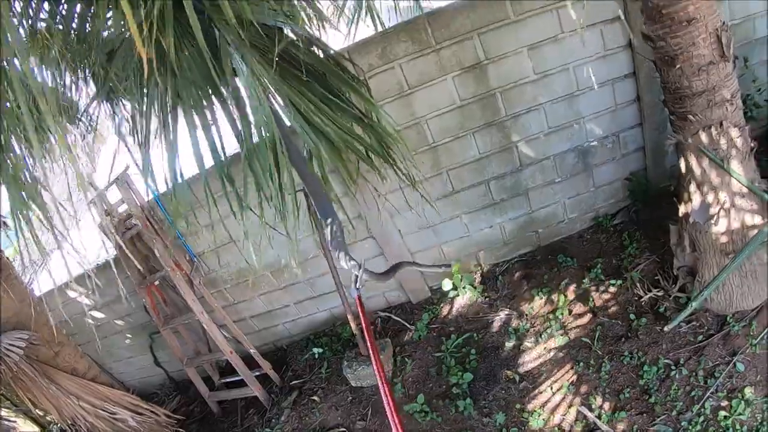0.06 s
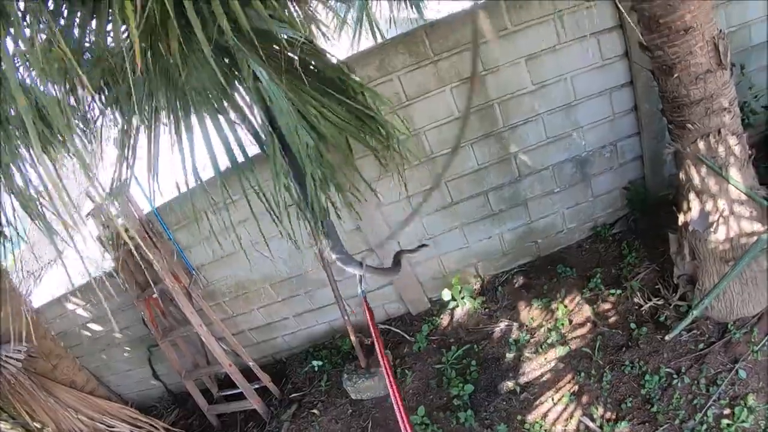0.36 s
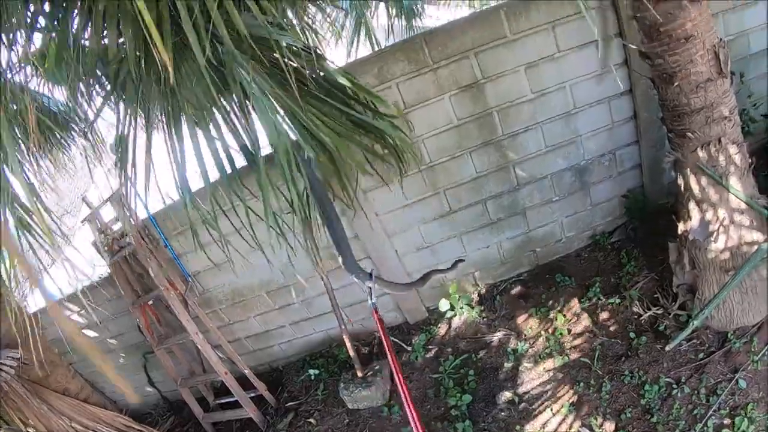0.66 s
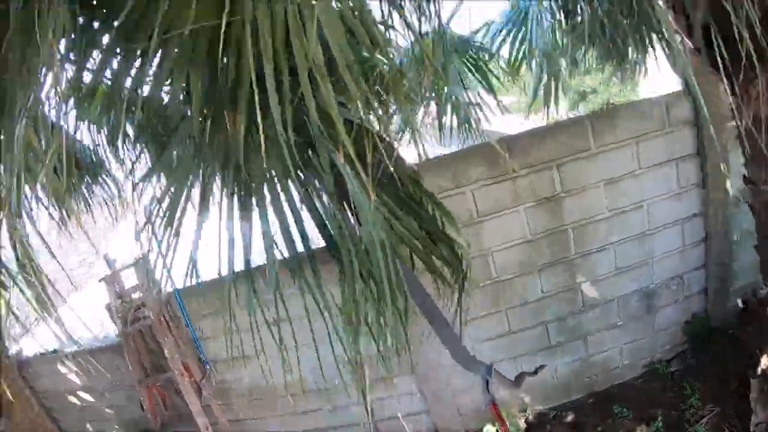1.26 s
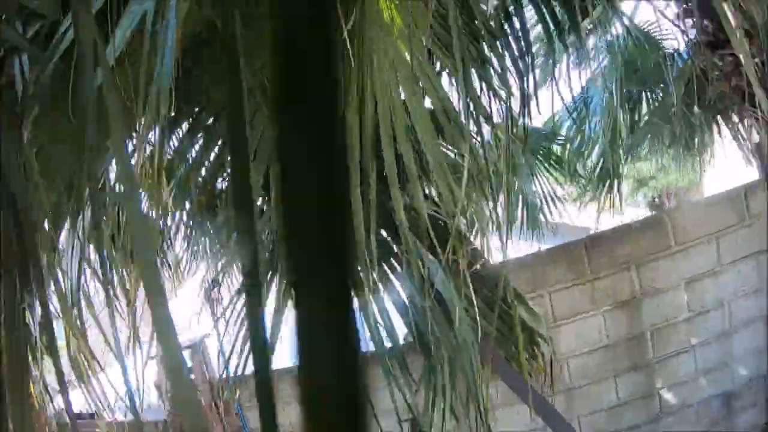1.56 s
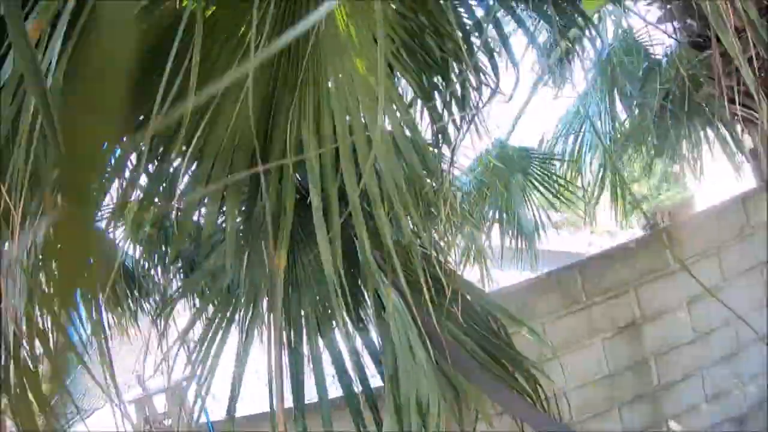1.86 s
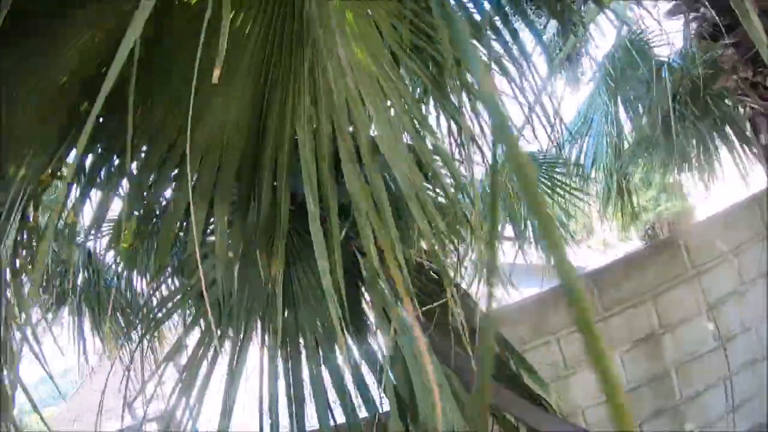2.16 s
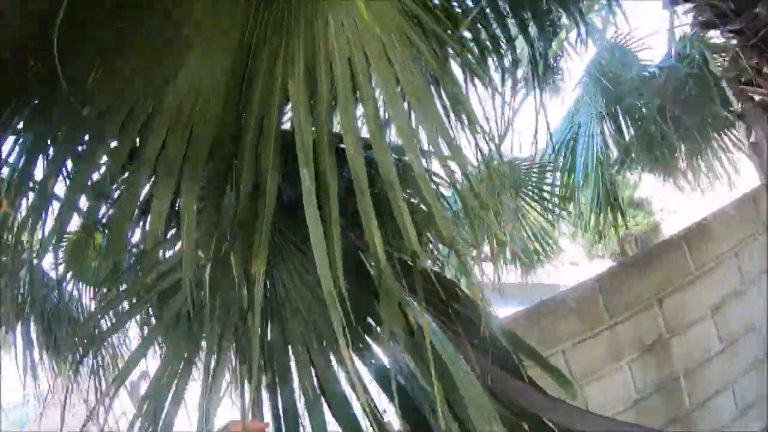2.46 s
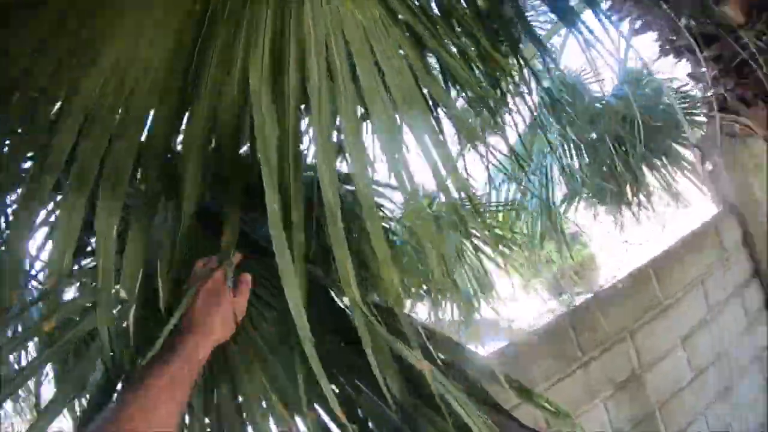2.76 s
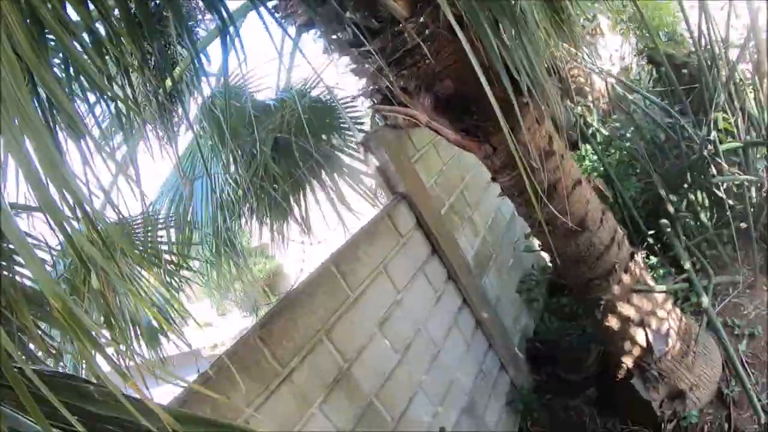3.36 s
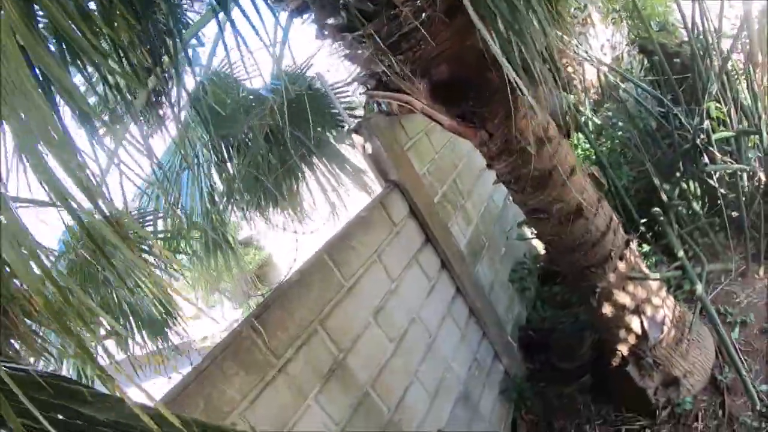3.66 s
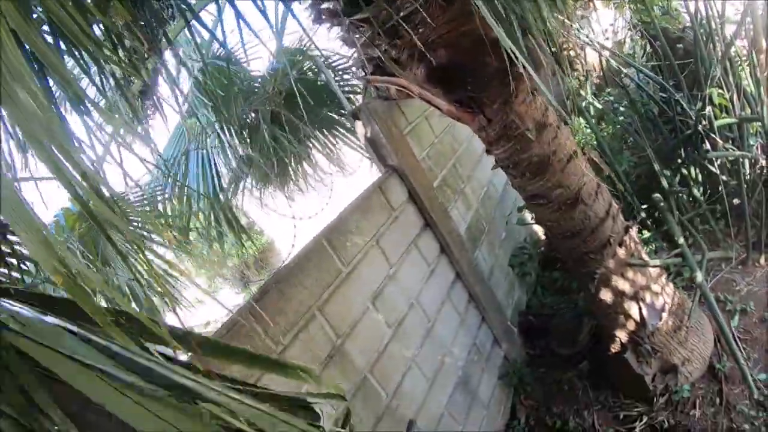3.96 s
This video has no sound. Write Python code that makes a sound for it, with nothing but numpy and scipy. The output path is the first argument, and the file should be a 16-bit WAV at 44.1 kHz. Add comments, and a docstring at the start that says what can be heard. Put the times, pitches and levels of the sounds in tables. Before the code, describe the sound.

Stiff palm fronds snap and scrape against the microphone over low wind rumble.

```python
"""Stiff fan palm fronds snap and scrape against a camera as someone carries it through them in a yard.
Leaf tips strike the shell and blades slide along it in tiny slips; each contact rings leaf and shell.
Something soft and heavy bumps the camera once. Wind and handling rumble in its two microphone ports,
over a steady distant hiss. Gain control dips after the loudest moments."""
import sys
import numpy as np
from scipy import signal
from scipy.fft import rfft, irfft
from scipy.io import wavfile
from scipy.ndimage import uniform_filter1d

SR = 44100
rng = np.random.default_rng(int(sys.argv[2]) if len(sys.argv) > 2 else 0)


def wrap_up_sound(samples):
    """Save the sound to the file named by the first command line argument, as 16-bit audio."""
    columns = np.atleast_2d(samples).T
    # keep every value between -1 and 1, then stretch to whole-number steps
    tamed = np.clip(columns, -1, 1)
    steps = np.round(tamed * 32767).astype(np.int16)
    wavfile.write(sys.argv[1], SR, steps)


N = 176400

# Contact balance, left minus right: bass_pan_db, middle_pan_db, treble_pan_db
CONTACT_PAN_DB = [-1.5, -.6, 1.8]


def amp(db):
    """Decibels to gain."""
    return 10 ** (np.asarray(db) / 20)


def spectrum_at(points, hz):
    """Interpolates (freq_hz, value) rows on a log-frequency axis."""
    freq_hz, value = np.transpose(points)
    return np.interp(np.log(hz + 1), np.log(freq_hz + 1), value)


def curve(points):
    """Joins (time_s, value) rows by straight lines."""
    return np.interp(np.arange(N) / SR, *np.transpose(points))


def pan(db):
    """Constant-power stereo gains from left minus right dB."""
    gains = amp(np.array([np.atleast_1d(db), -np.atleast_1d(db)]) / 2)
    return gains / np.sqrt(np.mean(gains ** 2, axis=0))


def add(mix, start_s, sound):
    """Mixes in a stereo sound."""
    part = mix[:, max(round(start_s * SR), 0):][:, :sound.shape[1]]
    part += sound[:, :part.shape[1]]


def hiss():
    """Distant hiss, strongest near 2 kHz and to the right, over the low rumble of the surroundings."""
    colour = [(71, -41), (120, -10.5), (184, -4.5), (217, -8.5), (301, -19), (334, -23), (362, -22),
              (580, -27), (742, -22.5), (1190, -22), (1490, -5.5), (1940, -7), (2290, -5), (2810, -7),
              (3050, -14), (4230, -24.5), (7200, -25), (13600, -54), (16000, -51)]  # mid spectrum: freq_hz, gain_db
    swell = [(0, 2), (.4, 4.5), (.8, 4.5), (1.2, 6.5), (2.2, 4), (3.2, 5), (3.6, 2), (3.9, 7), (4, 6)]  # slow drift: time_s, gain_db
    width = [(110, 11), (200, 3.5), (380, 3.5), (700, 14), (1290, 2), (2380, -6), (4400, 3.5), (8120, 1.5),
             (15000, 1)]  # stereo width: freq_hz, side_minus_mid_db
    balance = [(200, -.5), (1100, -1.5), (1550, -3.5), (2000, -4), (2400, -12.5), (3000, -6), (3800, 0),
               (4500, -7), (5500, 4), (7500, 4), (10000, 0.5)]  # direction: freq_hz, pan_db
    gain_db, low_cut_hz = -56, 70
    hz = np.fft.rfftfreq(N, 1 / SR)
    low_cut = hz ** 2 / (hz ** 2 + low_cut_hz ** 2)
    mid, side = rfft(rng.standard_normal((2, N))) * amp(spectrum_at(colour, hz)) * low_cut
    side *= amp(spectrum_at(width, hz))
    stereo = irfft(np.array([mid + side, mid - side]) * pan(spectrum_at(balance, hz)), N)
    return stereo / np.std(irfft(mid, N)) * amp(gain_db + curve(swell))


def wind():
    """Gusts and handling buffet both ports nearly alike."""
    gusts = [(0.0, -43.5), (0.41, -50), (1.05, -39.5), (1.09, -25), (1.18, -32.5), (1.2, -51), (1.26, -30),
             (1.4, -31.5), (1.7, -39.5), (1.86, -28), (1.93, -41.5), (1.98, -27.5), (2.02, -45),
             (2.09, -33), (2.14, -62), (2.19, -29), (2.35, -46), (2.45, -12), (2.61, -35.5), (2.65, -28),
             (2.84, -37), (2.87, -25), (3.11, -33.5), (3.16, -54), (3.19, -32.5), (3.34, -27),
             (3.39, -39.5), (3.81, -26), (3.85, -39.5), (4.0, -46.5)]  # buffeting envelope: time_s, gain_db
    colour = [(10, -8.5), (22, 1), (40, 3.5), (55, -4), (75, -20.5), (110, -27), (200, -50), (400, -57),
              (900, -87)]  # rumble spectrum: freq_hz, gain_db
    gain_db, pan_db, high_cut_hz, common_share = 1, -1.8, 900, 0.96
    hz = np.fft.rfftfreq(N, 1 / SR)
    shape = amp(spectrum_at(colour, hz)) / (1 + (hz / high_cut_hz) ** 2)
    rumble = irfft(rfft(rng.standard_normal((3, N))) * shape, N)
    air = np.sqrt(common_share) * rumble[0] + np.sqrt(1 - common_share) * rumble[1:]
    running_rms = np.sqrt(uniform_filter1d((air ** 2).mean(0), size=3500))
    return air / running_rms * amp(curve(gusts) + gain_db) * pan(pan_db)


def knock():
    """A soft, heavy bump rings only the camera's low resonances."""
    modes = [(121, -1, 0.037, .3), (257, 2.5, 0.015, .9), (520, 8, 0.012, 1.57), (660, -0.5, .012, 1.9),
             (1140, 8, 0.012, 2.36), (1460, 8.5, 0.0089, 1.2)]  # dull ring: freq_hz, gain_db, t60_s, right_phase_rad
    start_s, gain_db, push_peak_s = 2.4932, -17, 0.0007
    t = np.arange(4096) / SR
    hz, db, t60_s, right_phase = np.transpose(modes)[:, :, None]
    phase = 2 * np.pi * hz * t
    ring = (amp(db - 60 * t / t60_s) * np.sin([phase, phase - right_phase])).sum(1)
    push = np.exp(-(4 * (t - push_peak_s) / push_peak_s) ** 2)
    thud = signal.fftconvolve(ring, push[None] / push.sum(), axes=1)
    out = np.zeros((2, N))
    add(out, start_s, amp(gain_db) * thud * pan(CONTACT_PAN_DB[0]))
    return out


def contact_noise(samples, own_gain=0.6):
    """Contact noise common to both ports, plus a part that each hears alone."""
    noise = rng.standard_normal((samples, 3)).T
    return noise[0] + own_gain * noise[1:]


def shell(force, leaf_hz, levels_db, pan_db, span_s):
    """A force rings leaf and shell; where it lands sets three band levels, as rms over span_s."""
    shell_modes = [(170, -1.5, 0.02, 0.88), (351, 2, 0.014, 2.53), (574, 6.5, 0.0073, 2.01),
                   (1086, 0, 0.0064, 3.62), (1503, -2.5, 0.014, 2.47), (1893, -3.5, 0.0094, 1.46),
                   (2412, -5.5, 0.016, 1.57), (2830, -2.5, 0.0045, 1.01), (3300, -6.5, 0.0025, 1.06),
                   (4400, -4, 0.0025, 2.1), (5560, 0, 0.0067, 2.2), (6760, 5, 0.0019, 1.74),
                   (9600, -44, .0015, 0.72), (12200, -12, 0.0016, 0.65)]  # shell resonances: freq_hz, gain_db, t60_s, right_phase_rad
    bands = [(115, 1005), (980, 3750), (3800, 11050)]  # bass, middle, treble: low_hz, high_hz
    leaf_t60_s, rasp_t60_s, detune = 0.012, 0.008, 0.05
    rasp_hz = rng.uniform(4900, 7500)
    modes = np.array(shell_modes, float)
    contact_modes = [(hz, 0, t60_s, np.interp(hz, modes[:, 0], modes[:, -1]))
                     for hz, t60_s in [(leaf_hz, leaf_t60_s), (rasp_hz, rasp_t60_s)]]
    modes[:, 0] *= 1 + detune * rng.uniform(-1, 1, len(modes))
    hz, db, t60_s, right_phase = np.vstack([modes, contact_modes]).T[:, :, None]
    t = np.arange(1024) / SR
    phase = 2 * np.pi * hz * t
    ring = (amp(db - 60 * t / t60_s) * np.cos([phase, phase - right_phase])).sum(1)
    sound = signal.fftconvolve(force, ring, axes=1)
    out = 0
    for edges_hz, level_db, band_pan_db in zip(bands, levels_db, CONTACT_PAN_DB):
        band = signal.sosfilt(signal.butter(3, edges_hz, "bandpass", fs=SR, output="sos"), sound)
        band *= np.sqrt(span_s * SR / np.sum(band ** 2, axis=1, keepdims=True))
        out += band * amp(level_db) * pan(band_pan_db + pan_db)
    return out


def scrape(length_s, leaf_hz, levels_db, pan_db):
    """A ribbed blade sticks and slips: clumps of uneven clicks over a soft rub."""
    slips_per_s, spread_db, rub = 1800, 4, 0.22
    clump_hz, clump_db = 109, 1
    attack_s, release_s = 0.0013, 0.016
    t = np.arange(8192) / SR
    hz = np.fft.rfftfreq(len(t), 1 / SR)
    chance, size = rng.random((2, len(t)))
    slips = (chance < slips_per_s / SR) * amp(-spread_db * np.log(size + 0.06))
    friction = contact_noise(len(t)) * (slips + rub)
    clumps = irfft(rfft(rng.standard_normal(len(t))) * np.exp(-(hz / clump_hz) ** 2))  # ribs catching
    clumps /= np.sqrt(np.mean(clumps ** 2))
    pressure = np.clip(np.minimum(t / attack_s, (length_s - t) / release_s + 0.5), 0, 1)
    force = friction * pressure * amp(-clump_db * clumps)
    return shell(force, leaf_hz, levels_db, pan_db, span_s=length_s)


def snap(crackle_t60_s, leaf_hz, levels_db, pan_db):
    """A leaf tip strikes: one blow, a fast-dying crackle, a faint shiver of the leaf."""
    blow, shiver_db, shiver_t60_s = 1.6, -23, 0.025
    t = np.arange(2048) / SR
    crackle = amp(-60 * t / crackle_t60_s)
    shiver = amp(shiver_db - 60 * t / shiver_t60_s)
    force = contact_noise(len(t)) * (crackle + shiver)
    force[:, 0] += blow
    return shell(force, leaf_hz, levels_db, pan_db, span_s=0.005)


def fronds():
    """Snaps and scrapes, with a faint return from the wall and the leaves around."""
    # Tip strikes: start_s, crackle_t60_s, leaf_hz, bass_db, middle_db, treble_db, pan_db
    snaps = [(0.0075, 0.0029, 3110, -55, -42, -39, -2), (0.038, 0.026, 3100, -49, -39.5, -39, -2),
             (0.0944, 0.0065, 2750, -52.5, -34, -31.5, 5), (0.9, 0.014, 1590, -51, -38.5, -55, -2),
             (0.9726, 0.027, 1550, -39.5, -25, -34, -5), (0.995, 0.012, 2010, -51, -29, -39, -4),
             (1.015, 0.008, 1560, -59, -45, -50, 6), (1.0268, 0.013, 1560, -44.5, -28.5, -55, -7),
             (1.038, 0.021, 2230, -52, -35.5, -46, 0), (1.401, 0.032, 1800, -39, -34, -45.5, -1),
             (1.501, 0.012, 1500, -47, -37, -40, 2), (1.509, 0.018, 2550, -61, -33.5, -41, -2),
             (1.527, 0.025, 1680, -53, -30, -36.5, 2), (1.538, 0.0054, 2580, -56, -38.5, -41, -4),
             (1.572, 0.022, 1530, -63, -39.5, -59, 18), (1.6602, 0.021, 1280, -28, -25, -36.5, 1),
             (1.669, 0.016, 1320, -28.5, -20, -50, 3), (1.7225, 0.0048, 1600, -64, -35, -34, 6),
             (1.7983, 0.0034, 2520, -43, -33.5, -52, 5), (1.799, 0.013, 2520, -29, -30.5, -43, -29),
             (1.911, 0.0089, 1400, -74, -39, -46, 9), (1.955, 0.036, 1380, -53, -42.5, -48, -1),
             (1.971, 0.0083, 1920, -61, -41.5, -50, 1), (2.024, 0.0093, 1280, -42.5, -40, -47.5, -2),
             (2.072, 0.017, 2400, -73, -41, -65, -6), (2.3868, 0.0094, 2620, -40, -19, -32, -2),
             (2.395, 0.012, 2150, -45, -35, -49, -1), (2.4185, 0.013, 2350, -51, -36.5, -37.5, 11),
             (2.461, 0.0057, 2830, -41, -22.5, -23, 0.5), (2.534, 0.0061, 1110, -37.5, -61, -66, 2),
             (2.6212, 0.036, 2360, -49.5, -34, -54, -1), (2.672, 0.015, 2020, -53, -36, -43, 2),
             (2.862, 0.011, 2480, -59, -39.5, -57, -7), (2.9227, 0.01, 1530, -53, -39, -64, 16),
             (2.93, 0.0045, 1340, -47, -29.5, -55, -16), (2.9342, 0.0052, 2420, -46, -25, -24, -0.5),
             (2.9618, 0.011, 2550, -47, -37.5, -41.5, 5), (2.97, 0.0068, 2330, -65, -32.5, -54, -6),
             (3, 0.0064, 3110, -51, -34.5, -45, 0), (3.016, 0.041, 1350, -39.5, -26, -39, 3.5),
             (3.1185, 0.0071, 1770, -64, -36, -57, 8), (3.123, 0.0033, 1660, -51, -33.5, -47, 3)]
    # Blade slides: start_s, length_s, leaf_hz, bass_db, middle_db, treble_db, pan_db
    scrapes = [(0, 0.1, 1260, -59, -47, -52, 1), (0.1, 0.026, 1500, -66, -48, -57, 1),
               (0.917, 0.037, 1500, -56.5, -46.5, -48.5, -2.5), (1.0, 0.056, 1500, -66, -38.5, -51, -4.5),
               (1.335, 0.056, 1240, -50, -50, -65, -3), (1.408, 0.02, 1640, -48.5, -47, -54, -6),
               (1.499, 0.054, 1670, -56, -43, -49, 4), (1.55, 0.059, 2530, -65, -50.5, -60, -2),
               (1.68, 0.11, 2600, -50.5, -46.5, -51.5, -0.5), (1.705, 0.02, 2520, -67, -40, -47, -4),
               (1.76, 0.061, 2310, -59, -43, -45.5, 5), (1.804, 0.019, 2360, -48.5, -36.5, -55, 4),
               (1.908, 0.029, 1270, -52.5, -45.5, -51, -2), (2.022, 0.049, 2120, -57, -48, -52.5, -0.5),
               (2.42, 0.029, 2600, -54, -38, -42, -0.5), (2.45, 0.04, 1250, -48, -47, -46, 3),
               (2.497, 0.027, 1100, -34, -65, -82, 1), (2.526, 0.046, 1110, -45, -61, -76, -1),
               (2.626, 0.02, 2570, -62, -44.5, -63, -2), (2.679, 0.059, 2630, -71, -45.5, -53, 0),
               (2.747, 0.099, 2530, -71, -55.5, -60.5, -1), (2.838, 0.045, 2660, -77, -50.5, -56, -1),
               (2.889, 0.045, 1560, -50, -45, -61, -1), (2.94, 0.088, 2330, -53, -44, -52, -6),
               (3.021, 0.022, 1030, -46, -37, -50, -4), (3.042, 0.06, 1260, -55, -50, -46, 0.5),
               (3.089, 0.045, 1660, -65, -44, -46.5, -1)]
    yard_db, yard_t60_s = -25, 0.25
    direct = np.zeros((2, N))
    for start_s, crackle_t60_s, leaf_hz, *levels_db, pan_db in snaps:
        add(direct, start_s, snap(crackle_t60_s, leaf_hz, levels_db, pan_db))
    for start_s, length_s, leaf_hz, *levels_db, pan_db in scrapes:
        add(direct, start_s, scrape(length_s, leaf_hz, levels_db, pan_db))
    t = np.arange(16384) / SR
    tail = rng.standard_normal((2, len(t))) * amp(-60 * t / yard_t60_s)
    tail /= np.linalg.norm(tail[0])
    return direct + amp(yard_db) * signal.fftconvolve(direct, tail, axes=1)[:, :N]


def scene():
    """Fronds and a knock on the camera, over wind and distant hiss."""
    return fronds() + knock() + wind() + hiss()


def record(dry):
    """Gain control dips after loud peaks; a low-pass limits the band."""
    threshold_db, duck_share, release_db_per_s, cutoff_hz = -34, 0.15, 42, 16200
    smoother = [1 / 512], [1, 1 / 512 - 1]  # one pole, 12 ms
    power = signal.lfilter(*smoother, (dry ** 2).mean(0))
    fall_db = np.arange(N) * release_db_per_s / SR
    held_db = np.maximum.accumulate(10 * np.log10(power + 1e-12) + fall_db) - fall_db
    over_db = np.maximum(held_db - threshold_db, 0)
    ducked = dry * amp(-duck_share * signal.lfilter(*smoother, over_db))
    low_pass = signal.firwin(511, cutoff_hz, window=("kaiser", 9), fs=SR)
    return signal.oaconvolve(ducked, low_pass[None], "same")


dry = scene()
out = record(dry)
wrap_up_sound(out)
```